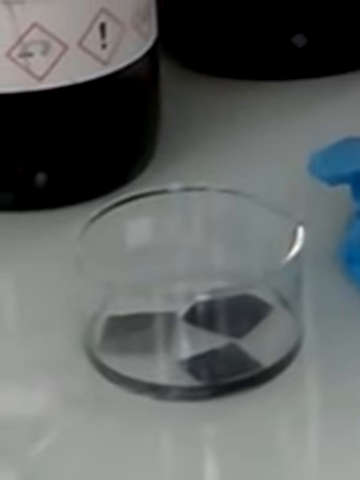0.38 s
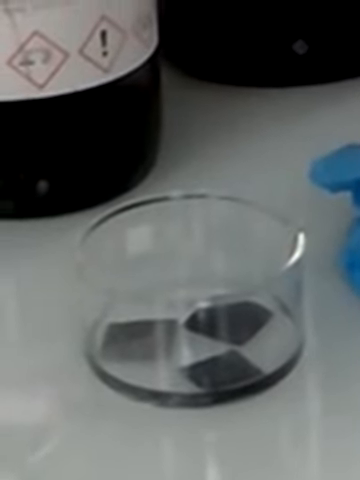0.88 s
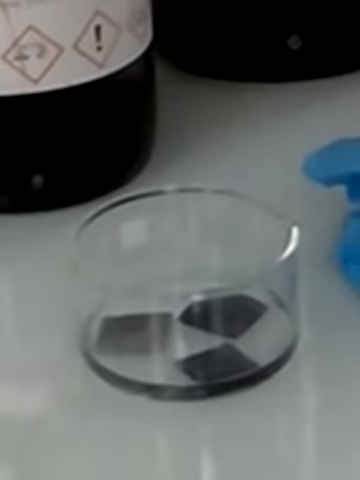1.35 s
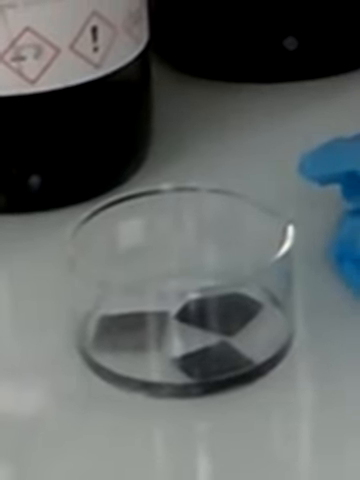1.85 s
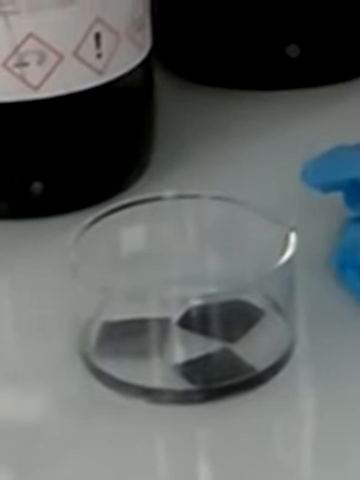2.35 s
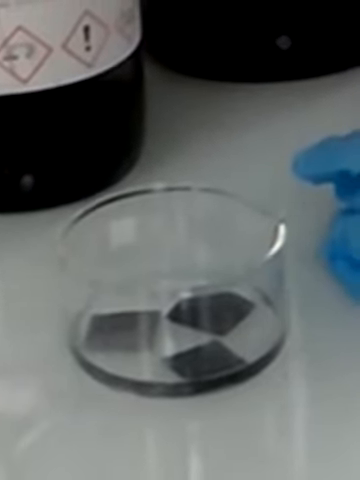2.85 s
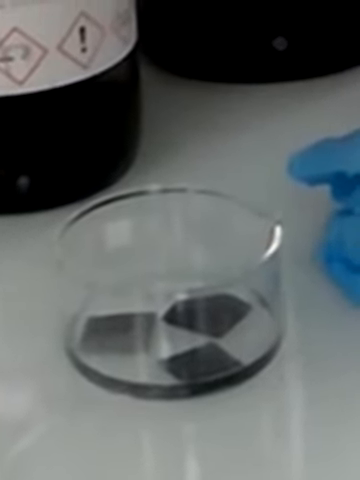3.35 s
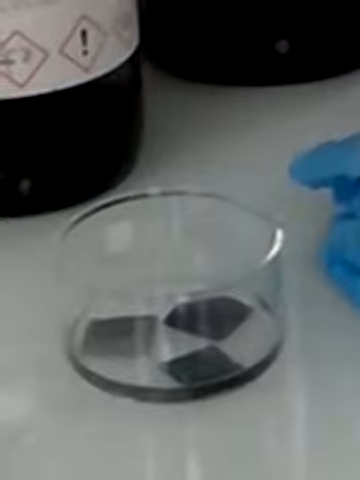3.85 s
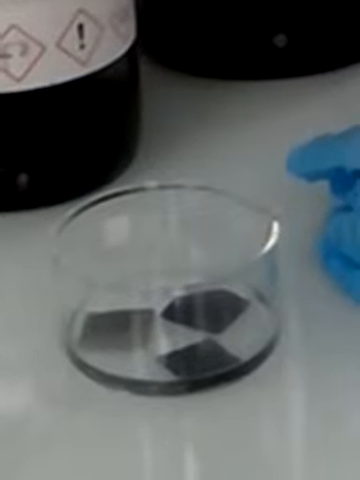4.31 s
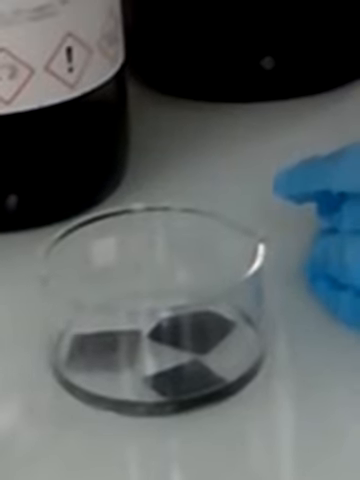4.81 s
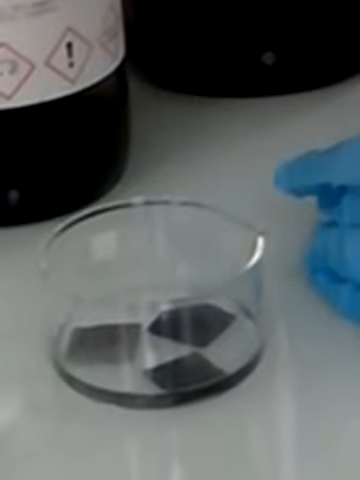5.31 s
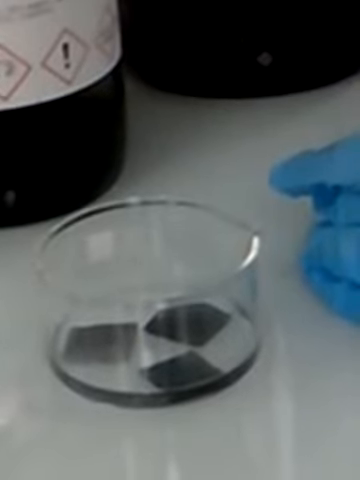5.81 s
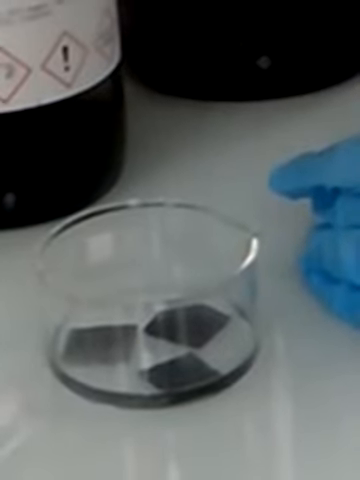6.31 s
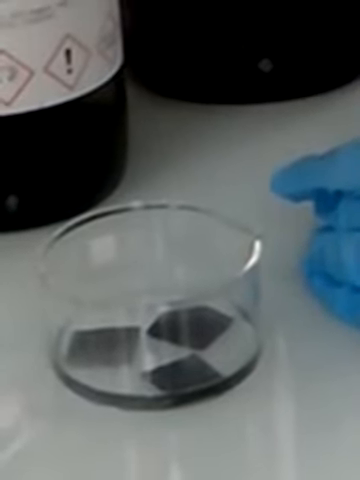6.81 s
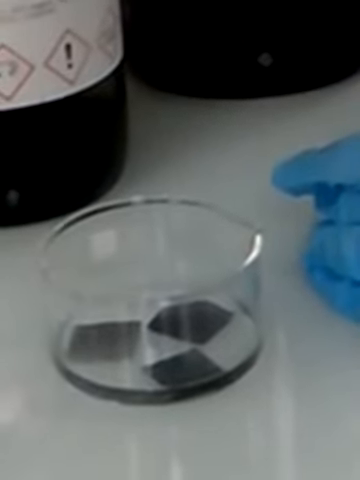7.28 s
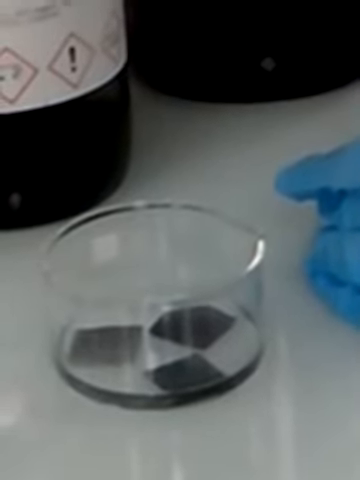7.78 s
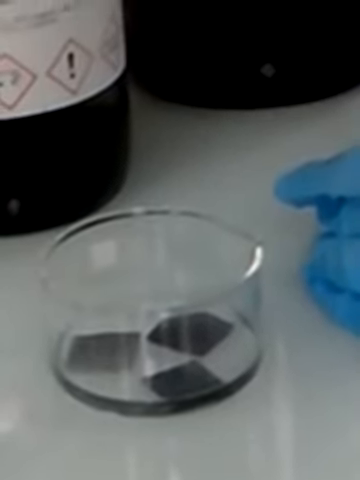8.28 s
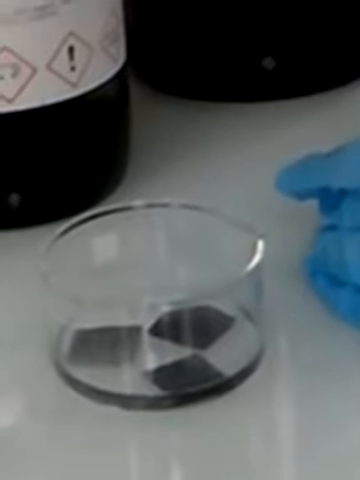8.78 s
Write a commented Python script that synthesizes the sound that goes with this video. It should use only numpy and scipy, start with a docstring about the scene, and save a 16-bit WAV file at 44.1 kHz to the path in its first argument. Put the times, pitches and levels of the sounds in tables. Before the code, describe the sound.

A laboratory extraction fan runs steadily, a low booming rush of air with a thin, fast-throbbing whine near 1 kHz and a few faint far ticks.

```python
"""In a laboratory, at the hood, an extraction fan runs steadily: filtered noise booms in the duct, rushes
through the baffles and hisses at the sash, with brief surges of single standing waves. Sines make the motor
hum, and three close whines near 1 kHz beat into a fast throb that shakes a buzzing panel. A few faint ticks,
short bursts of band noise and small rings, sound far off. A small camera microphone hears it in mono."""
import sys
import numpy as np
from scipy import signal
from scipy.fft import rfft, irfft, next_fast_len
from scipy.io import wavfile
from scipy.ndimage import uniform_filter1d, map_coordinates

SR = 44100
rng = np.random.default_rng(int(sys.argv[2]) if len(sys.argv) > 2 else 0)


def gain_from_db(level_db):
    """Turn a decibel level (scalar or array-like) into a linear amplitude factor."""
    decades = np.asarray(level_db, float) / 20
    return 10 ** decades


def waveform_to_disk(signal):
    """Save audio, clipped to [-1, 1], as 16-bit WAV at the path in sys.argv[1]."""
    frames = np.transpose(np.atleast_2d(signal))
    scaled = np.clip(frames, -1, 1) * 32767
    samples = np.round(scaled).astype(np.int16)
    wavfile.write(sys.argv[1], SR, samples)


N = 403515
T = np.arange(N) / SR  # seconds

# Level of the duct boom. Each row: time in seconds, level in dB.
BOOM_LEVEL = [(0.0, -22), (0.15, -17.5), (0.2, -26), (0.36, -13.5), (0.76, -18.5), (0.94, -17.5),
              (1.02, -25), (1.12, -15.5), (1.32, -22), (1.5, -17), (1.91, -23.5), (2.06, -18), (2.24, -12),
              (2.27, -21.5), (2.65, -17.5), (2.7, -29.5), (2.75, -12), (2.78, -22.5), (3.08, -13.5),
              (3.11, -19.5), (3.36, -19.5), (3.41, -14.5), (3.56, -24.5), (3.9, -16), (3.95, -25.5),
              (4.03, -10.5), (4.05, -18), (4.28, -11.5), (4.43, -22.5), (4.48, -12.5), (4.53, -31.5),
              (4.56, -14.5), (4.71, -25), (4.74, -17.5), (5.76, -17.5), (5.83, -27), (5.89, -16),
              (5.94, -26), (6.14, -15.5), (6.19, -25.5), (6.42, -15), (6.45, -23.5), (6.52, -14),
              (6.65, -12), (6.68, -23), (6.78, -11.5), (6.86, -35.5), (6.88, -14), (6.98, -25), (7.03, -13),
              (7.08, -21), (8.31, -20), (8.44, -17), (8.51, -27.5), (8.66, -17), (8.79, -25), (8.92, -14.5),
              (8.95, -23), (9.05, -12), (9.15, -18.5)]
# Spectrum of the duct boom. Each row: frequency in Hz, relative density in dB per Hz.
BOOM_COLOUR = [(35, -66), (60, -34.5), (75, -22.5), (133, -4.5), (161, 1.5), (187, -2.5), (270, -17),
               (350, -33), (590, -120)]
# Spectrum of the rush through the baffles. Each row: frequency in Hz, relative density in dB per Hz.
RUSH_COLOUR = [(150, -31), (250, -13.5), (268, -9), (327, 1.5), (356, -5.5), (387, -1), (425, -6.5),
               (479, -3), (662, -17.5), (720, -22.5), (940, -44), (1580, -120)]
# Spectrum of the hiss at the sash, before the hood colours it. Each row: frequency in Hz, relative dB per Hz.
HISS_COLOUR = [(410, -46.5), (690, -14.5), (947, -12.5), (1055, -13.5), (1100, -8.5), (1340, -10.5),
               (1520, -20.5), (2610, -16), (3480, -20.5), (3820, -25), (4430, -27), (6840, -24.5),
               (7520, -33), (7700, -52.5), (8300, -63.5), (8630, -53), (11200, -86.5), (19000, -120)]
# Standing waves of hood and duct that colour the hiss. Each row: centre in Hz, width in Hz, lift in dB.
HOOD_RESONANCES = [(776, 98, 8.5), (920, 110, 5), (1075, 45, 6), (1114, 44, 0.5), (1220, 70, 2),
                   (1314, 56, 8.5), (1371, 51, 1.5), (1461, 45, 4.5), (1570, 40, 4), (1778, 87, 5),
                   (1817, 43, 3.5), (1987, 42, 7), (2340, 32, 5), (2550, 64, 5.5), (2730, 53, 4),
                   (3240, 22, 8), (3384, 60, 5.5), (3560, 54, 7), (4350, 1130, 5.5), (4300, 120, 2.5),
                   (4480, 82, 3.5)]
# Spectrum of the deepest rumble. Each row: frequency in Hz, relative density in dB per Hz.
RUMBLE_COLOUR = [(15, -45.5), (22, -6.0), (45, -4.0), (62, -8), (70, -47.5)]
# Brief surges of single standing waves. Each row: centre time in seconds, peak level in dB rms, pitch in Hz.
SURGES = [(.24, -18, 332), (1.29, -22, 325), (1.86, -20.5, 332), (3.1, -17, 338), (3.23, -16, 346),
          (6.01, -20, 326), (2.27, -33, 1320), (4.9, -36, 1330), (4.98, -30, 1350), (5.91, -33, 1310),
          (6.05, -37, 1300), (7.4, -33, 1320), (2.63, -37, 1510), (5.0, -33, 1470)]
# Lowest whine, drifting with its motor's speed. Each row: time in seconds, pitch in Hz, level before beating in dB rms.
LOW_WHINE_DRIFT = [(0, 1022.09, -34), (.8, 1022.09, -32), (1.2, 1022.1, -33.5), (1.8, 1022.2, -33.5),
                   (2.5, 1022.1, -33), (3.2, 1022.05, -33.5), (4.2, 1021.82, -33.6), (5.2, 1021.9, -34.6),
                   (6.5, 1021.95, -35), (7.7, 1021.68, -34.6), (8.6, 1022.0, -33.5), (9.15, 1022.05, -33)]
# Two steadier whines just above it. Each row: pitch in Hz, mean level in dB over the lowest whine.
UPPER_WHINES = [(1030.429, -6.5), (1031.417, -12)]
# Buzz of the panel shaken by the throb. Each row: frequency in Hz, relative density in dB per Hz.
PANEL_COLOUR = [(900, -65), (990, -6), (1050, -5), (1085, 1), (1130, -8), (1190, -13.5), (1300, -62.5)]
# Audible orders of the fan shaft. Each row: multiple of the shaft rate, nominal level in dB rms.
SHAFT_ORDERS = [(1, -41), (4, -35), (5, -38)]
# Other motor and mains tones. Each row: pitch in Hz, nominal level in dB rms.
STRAY_TONES = [(51.89, -51), (200.1, -35), (328.2, -38), (375.1, -43), (846.2, -55), (968.5, -53),
               (1122, -50), (1435.5, -50), (1579.3, -60), (1593.9, -59), (1709.6, -64), (1744.1, -57),
               (1813.2, -60), (1830.5, -61), (3470.9, -62), (3553.7, -60), (3873.9, -66), (4196.8, -60),
               (4299.9, -59), (4321.9, -63), (4357.8, -62), (4442.1, -62), (4481.8, -64), (3601.4, -65),
               (4178.8, -66), (4364.5, -66), (4448, -65), (4520, -67), (4680.8, -67), (4761.5, -69),
               (4841, -70), (5165.3, -69)]
# Far ticks. Each row: start in seconds, level before shaping in dB, centre in Hz, half width in Hz,
# duller part in dB over the bright one.
FAR_TICKS = [(1.005, -34, 6300, 606, 0.5), (1.007, -47.5, 5670, 300, -20), (1.596, -38, 7070, 653, -28),
             (3.382, -33.5, 5410, 450, -2.5), (3.388, -36, 6500, 596, -22), (4.201, -40.5, 6880, 500, -25)]
# Small glassy rings. Each row: start in seconds, level before shaping in dB, pitch in Hz.
GLASSY_RINGS = [(3.383, -31, 5705), (4.383, -38, 6080), (6.76, -38, 5700)]

LUMPS_PER_S, LUMP_DB = 23, 3.4  # short random surges of the boom
EVENING = 0.65  # how far the boom's own fading is evened out, 0 to 1
RUSH_DB, RUSH_FOLLOWS = -25, 0.053  # mean level; dB of rush per dB of boom
GUSTS_PER_S, GUST_DB = 19, 1.3  # flutter of the rush
HISS_DB, HISS_SAG_DB_PER_S = -31, 0.0762  # base level at the start; slow sag
FLUTTERS_PER_S, FLUTTER_DB = 22, 3.2  # the hiss flutters in one band
FLUTTER_HZ, FLUTTER_WIDTH_HZ = 1300, 190  # centre and half width of that band
SURGE_S, SURGE_WIDTH_HZ = 0.019, 30  # half length; half width of the band
IN_STEP_S = 5.828  # all three whines are in phase here
WHINE_WAVER_DB = 0.8  # slow drift of the upper whines
PEAKING, PEAK_LAG_S = 0.55, 0.011  # how much and how late the throb's crests are sharpened
BUZZ_DB, BUZZ_POWER = -5, 2.1  # dB over the lowest whine's table level; steepness of its following
SHAFT_HZ = 48.12
TICK_RISE_S, TICK_HOLD_S, TICK_T60_S = 0.003, 0.028, 0.14  # rise; time before the fade; fade by 60 dB
BURSTS_PER_S, BURST_DB = 150, 3.2  # unevenness inside a tick
DULL_HZ, DULL_WIDTH_HZ = 2050, 500  # centre and half width of a tick's duller part
RING_SHORTER = 1.6  # a ring fades this much faster than a tick


def unit(x):
    """Scales a signal to rms 1."""
    return x / np.sqrt(np.mean(x ** 2) + 1e-20)


def along(points, hz):
    """Reads a (Hz, value) curve on a log frequency axis."""
    f, v = np.transpose(points)
    return np.interp(np.log(hz + 1), np.log(f + 1), v)


def wobble(knots_per_s):
    """A smooth curve through random knots."""
    return map_coordinates(rng.standard_normal(400), [T * knots_per_s])


def filtered(x, response):
    """Multiplies the spectrum of x by a response of frequency."""
    m = next_fast_len(len(x) + 8192)
    return irfft(rfft(x, m) * response(np.fft.rfftfreq(m, 1 / SR)), m)[:len(x)]


def bell(centre_hz, width_hz):
    """A bell-shaped band response, down to 1/e at width_hz from its centre."""
    return lambda hz: np.exp(-((hz - centre_hz) / width_hz) ** 2)


def band_noise(length, centre_hz, width_hz):
    """Random noise of rms 1 in one bell-shaped band."""
    return unit(filtered(rng.standard_normal(length), bell(centre_hz, width_hz)))


def evened(x, share):
    """Takes out part of a signal's own swelling and fading."""
    envelope = uniform_filter1d(np.abs(x), size=1500)
    return unit(x / (envelope + 0.2) ** share)


def turbulence(colour_db, patchy_db):
    """Noise of rms 1 with patches of random gain in time and pitch, as eddies come and go."""
    z = signal.stft(rng.standard_normal(N + 1024), nperseg=1024)[2]
    patches = rng.standard_normal(z.shape)
    patches = uniform_filter1d(patches, size=6, axis=0)
    patches = uniform_filter1d(patches, size=6, axis=1)
    air = signal.istft(z * gain_from_db(patchy_db * unit(patches)), nperseg=1024)[1][:N]
    return unit(filtered(air, lambda hz: gain_from_db(colour_db(hz))))


def duct_boom(level_db):
    """Low turbulence in the duct, partly evened, then made lumpy by short random surges."""
    air = turbulence(lambda hz: along(BOOM_COLOUR, hz), patchy_db=-0.5)
    lumps = gain_from_db(LUMP_DB * wobble(LUMPS_PER_S))
    return gain_from_db(level_db) * unit(lumps * evened(air, EVENING))


def baffle_rush(boom_db):
    """Turbulence through the baffles: it follows the boom's level slightly and flutters in gusts."""
    level_db = RUSH_DB + RUSH_FOLLOWS * (boom_db - boom_db.mean())
    gusts_db = GUST_DB * wobble(GUSTS_PER_S)
    return gain_from_db(level_db + gusts_db) * turbulence(lambda hz: along(RUSH_COLOUR, hz), patchy_db=1.0)


def sash_hiss():
    """Turbulence at the sash, lifted at the standing waves of hood and duct, fluttering in one band."""
    def colour_db(hz):
        """The hiss spectrum plus one resonance peak per standing wave."""
        lift = sum(db / (1 + (2 * (hz - c) / w) ** 2) for c, w, db in HOOD_RESONANCES)
        return along(HISS_COLOUR, hz) + lift

    hiss = gain_from_db(HISS_DB - HISS_SAG_DB_PER_S * T) * turbulence(colour_db, patchy_db=1.8)
    band = filtered(hiss, bell(FLUTTER_HZ, FLUTTER_WIDTH_HZ))
    flutter = unit(gain_from_db(FLUTTER_DB * wobble(FLUTTERS_PER_S)))
    return hiss + band * (flutter - 1)


def deep_rumble():
    """Patchy turbulence at the very bottom of the airflow."""
    return gain_from_db(-47.5) * turbulence(lambda hz: along(RUMBLE_COLOUR, hz), patchy_db=2.5)


def airflow():
    """Air drawn by the fan: duct boom, baffle rush, sash hiss and deep rumble."""
    boom_db = np.interp(T, *np.transpose(BOOM_LEVEL))
    return duct_boom(boom_db) + baffle_rush(boom_db) + sash_hiss() + deep_rumble()


def standing_wave_surges():
    """Single standing waves of the hood swell briefly: evened narrow noise under a bell-shaped envelope."""
    out = np.zeros(N)
    for s, db, hz in SURGES:
        envelope = np.exp(-((T - s) / SURGE_S) ** 2)
        out += gain_from_db(db) * envelope * evened(band_noise(N, hz, SURGE_WIDTH_HZ), 1)
    return out


def throbbing_whines():
    """Three whines beat about 8.5 times a second, swell once a second and shake a buzzing panel."""
    s, hz, db = np.transpose(LOW_WHINE_DRIFT)
    turns = np.cumsum(np.interp(T, s, hz)) / SR
    turns -= turns[round(IN_STEP_S * SR)]
    beat = np.exp(2j * np.pi * turns)
    for f, over_db in UPPER_WHINES:
        strength = gain_from_db(over_db + WHINE_WAVER_DB * wobble(2.9))
        beat = beat + strength * np.exp(2j * np.pi * f * (T - IN_STEP_S))
    # the beat's envelope, slightly late, sharpens the crests and drives the panel
    throb = np.roll(np.abs(beat), round(PEAK_LAG_S * SR))
    whine = np.sqrt(2) * beat.real * throb ** PEAKING
    panel = turbulence(lambda f: along(PANEL_COLOUR, f), patchy_db=3.0)
    buzz = gain_from_db(BUZZ_DB) * panel * unit(throb ** BUZZ_POWER)
    return gain_from_db(np.interp(T, s, db)) * (whine + buzz)


def motor_hum():
    """Shaft orders and stray motor and mains tones: sines at random phase whose strength drifts slowly."""
    out = np.zeros(N)
    for hz, db in [(k * SHAFT_HZ, db) for k, db in SHAFT_ORDERS] + STRAY_TONES:
        phase = rng.uniform(0, 2 * np.pi)
        strength = np.sqrt(2) * gain_from_db(db + 2 * wobble(1.53))
        out += strength * np.cos(2 * np.pi * hz * T + phase)
    return out


def tick_bursts(t):
    """Fast random gain that makes a tick or ring uneven."""
    return gain_from_db(BURST_DB * map_coordinates(rng.standard_normal(50), [t * BURSTS_PER_S]))


def far_ticks():
    """Bright rustles, some with a duller part near 2 kHz, and small rings: quick rise, uneven bursts, fade."""
    out, t = np.zeros(N + SR), T[:SR // 4]
    rise = (1 - np.exp(-t / TICK_RISE_S)) ** 2
    shape = rise * gain_from_db(-60 * np.clip(t - TICK_HOLD_S, 0, 1) / TICK_T60_S)
    for s, db, hz, width, low_db in FAR_TICKS:
        bright = band_noise(len(t), hz, width)
        dull = gain_from_db(low_db) * band_noise(len(t), DULL_HZ, DULL_WIDTH_HZ)
        out[round(s * SR):][:len(t)] += gain_from_db(db) * (bright + dull) * tick_bursts(t) * shape
    for s, db, hz in GLASSY_RINGS:
        ring = np.sin(2 * np.pi * hz * t)
        out[round(s * SR):][:len(t)] += gain_from_db(db) * ring * tick_bursts(t) * shape ** RING_SHORTER
    return out[:N]


def scene():
    """Hood, motors and far ticks all reach one microphone."""
    mix = airflow() + standing_wave_surges() + throbbing_whines() + motor_hum() + far_ticks()
    return mix[None]  # one channel


def band_limit(x):
    """A steep low-pass at the top of the band."""
    return signal.sosfilt(signal.butter(12, 8780, fs=SR, output="sos"), x)


def record(dry):
    """The finished mono mix as the small camera keeps it."""
    return band_limit(dry)


dry = scene()
out = record(dry)
waveform_to_disk(out)
```